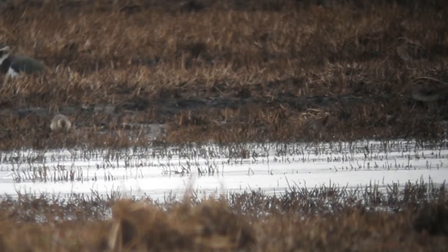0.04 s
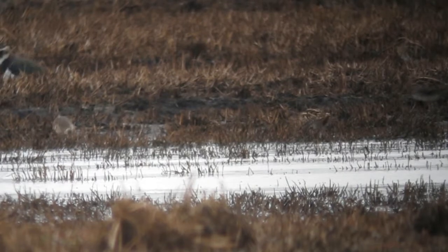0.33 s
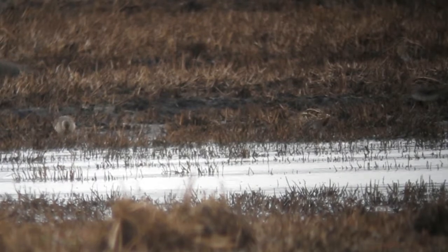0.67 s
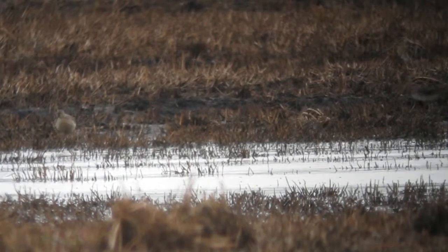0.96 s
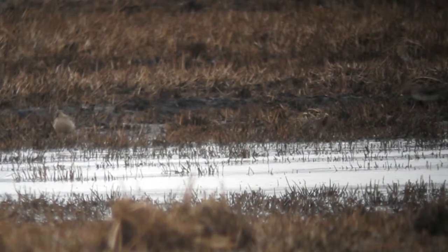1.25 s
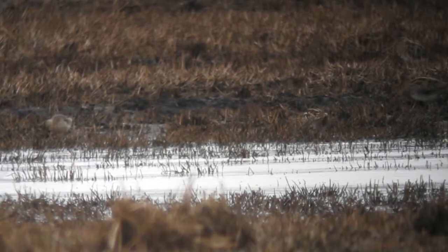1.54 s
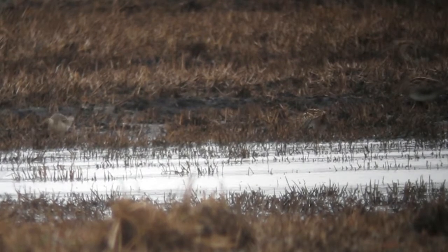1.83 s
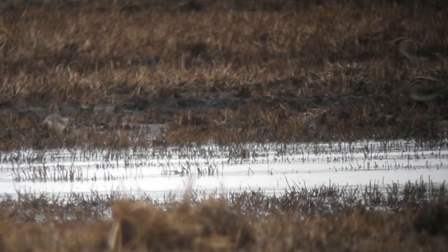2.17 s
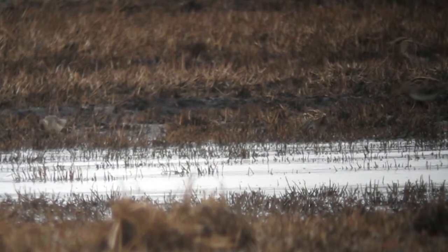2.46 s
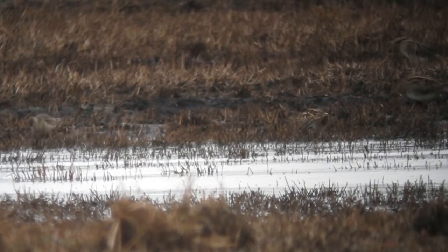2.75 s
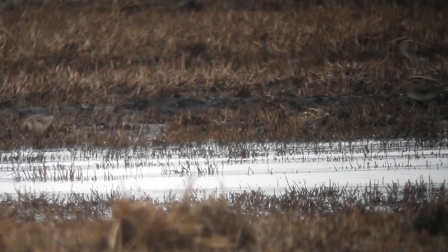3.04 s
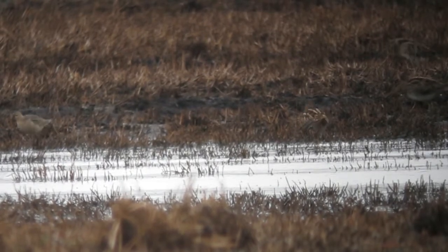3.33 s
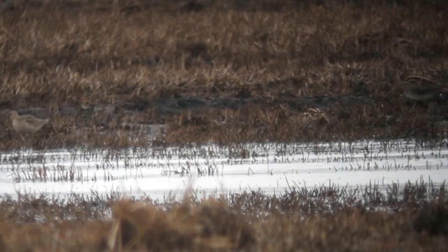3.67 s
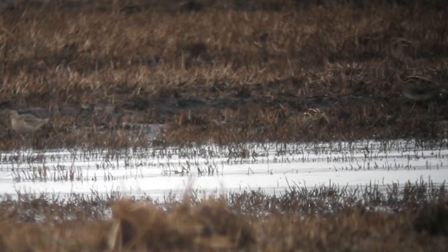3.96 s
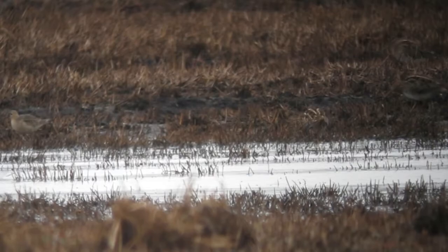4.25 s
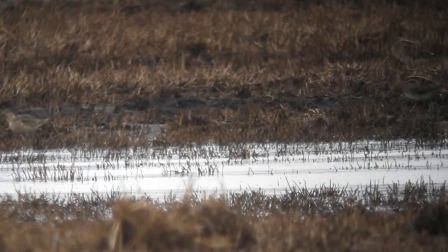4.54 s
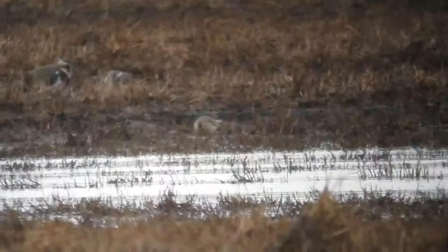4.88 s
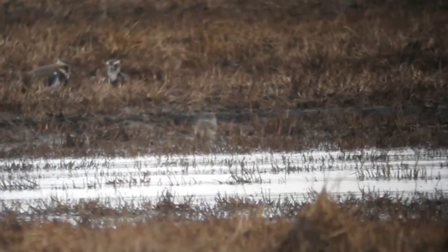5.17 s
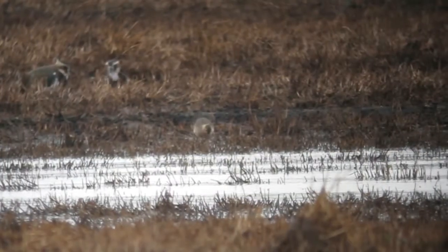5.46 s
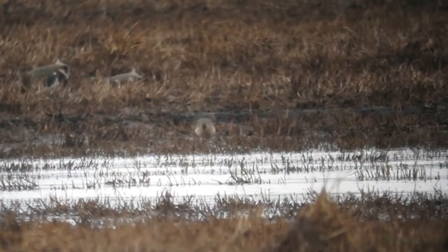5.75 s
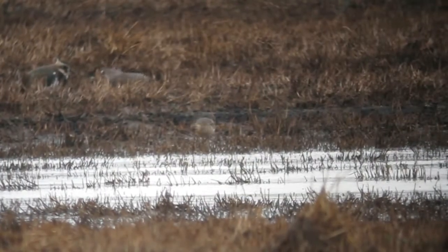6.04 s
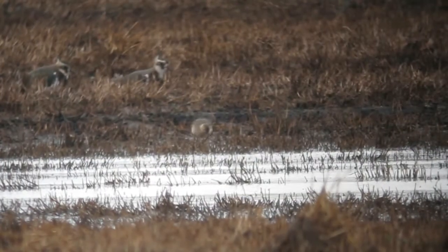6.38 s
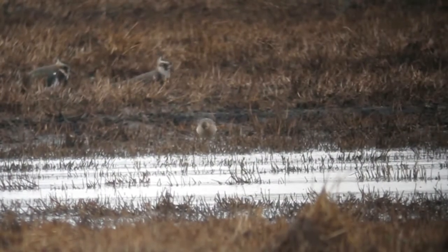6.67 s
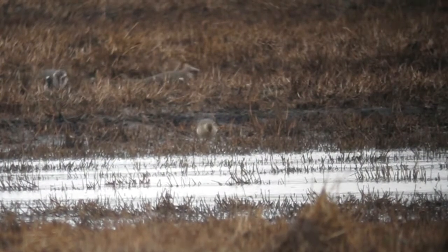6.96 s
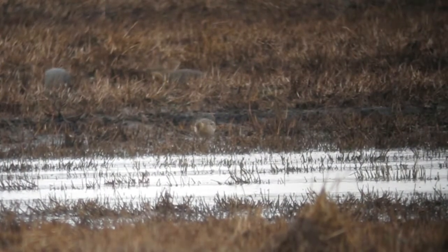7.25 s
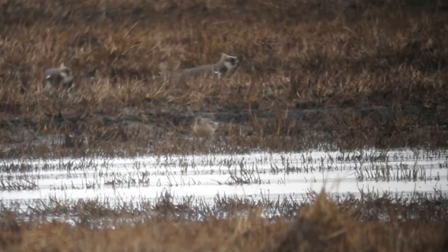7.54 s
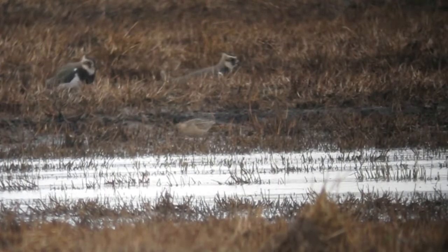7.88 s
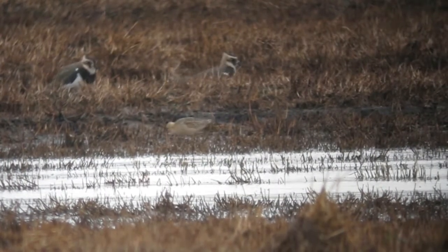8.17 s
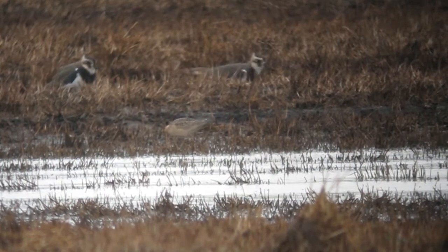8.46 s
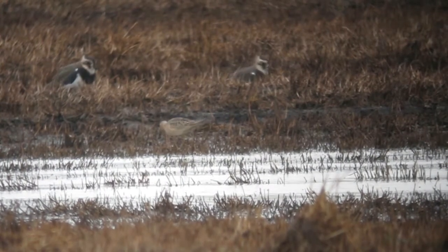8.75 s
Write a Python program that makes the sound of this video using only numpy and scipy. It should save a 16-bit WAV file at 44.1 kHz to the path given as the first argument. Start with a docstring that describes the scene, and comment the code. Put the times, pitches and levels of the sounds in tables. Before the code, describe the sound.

Low, thumping wind gusts hit the microphone while scattered raindrops tick close by and water birds twitter faintly far away.

```python
"""The edge of a flooded meadow in gusty wind and light rain, heard from a camera's two microphone ports.
Eddies buffet the ports, the left one most, and overload them; single drops tap on and around the body.
Grass hisses in the breeze, and one gust swishes through the nearest stalks. Far off a dull roar grows
over a low rumble, and water birds whistle and twitter in the distance."""
import sys
import numpy as np
from scipy import signal
from scipy.io import wavfile
from scipy.ndimage import uniform_filter1d

SR = 44100
rng = np.random.default_rng(int(sys.argv[2]) if len(sys.argv) > 2 else 0)


def transcribe(u):
    """Save the signal u as a 16-bit wav file named by the first command-line argument.

    u: samples, shape (n,) or (channels, n), limited to [-1, 1]; the rate is SR.
    q: integer samples, one column per channel.
    """
    v = np.clip(np.atleast_2d(u).T, -1, 1)
    q = np.round(v * 32767).astype(np.int16)
    wavfile.write(sys.argv[1], SR, q)


N = 392931

# Diffuse sound at the two ports. Each row: frequency in Hz, left-right correlation from -1 to 1.
PORT_LIKENESS = [(30, 0.5), (100, 1), (500, 0.83), (1000, 0.26), (2500, 0.057), (5000, -0.31),
                 (12000, 0.086)]
# Wind fluttering on the exposed left port between buffets. Each row: time in seconds, level in dB.
FLUTTER_LEVEL = [(0.0, -48), (0.45, -43), (1.3, -34.5), (1.95, -60.5), (2.25, -31.5), (2.75, -39.5),
                 (3.05, -82), (3.55, -36.5), (3.8, -61), (4.05, -34.5), (4.9, -38.5), (5.45, -50),
                 (6.05, -36.5), (7.45, -33.5), (7.8, -58), (8.91, -46)]
# Buffets on the ports. Each row: peak time in seconds, level at the windward port in dB,
# length in seconds, left over right in dB.
PORT_BUFFETS = [(0.592, -22, 0.05, 22), (0.694, -13.5, 0.072, 37), (0.791, -12, 0.027, 29),
                (0.85, -31.5, 0.1, -18), (0.926, -20.5, .04, 12), (0.981, -15.5, 0.062, 18),
                (1.085, -24.5, 0.083, 27), (1.216, -21.5, 0.16, 28), (2.149, -20.5, 0.031, 29),
                (2.292, -18, 0.068, 24), (2.345, -15.5, 0.081, 17), (2.395, -14, 0.07, 20),
                (2.474, -19.5, 0.091, 29), (2.62, -23.5, 0.093, 29), (3.496, -26.5, 0.043, 24),
                (3.635, -27, 0.073, 9), (4.23, -15, 0.052, 32), (4.292, -21, 0.077, 18),
                (4.362, -25, 0.032, 14), (4.424, -18.5, 0.054, 8), (4.565, -21.5, 0.094, 26),
                (4.73, -16.5, 0.053, 27), (4.867, -19.5, 0.03, -3.5), (4.894, -27, 0.13, 22),
                (5.088, -14.5, 0.026, 32), (5.148, -20, 0.075, 24), (5.22, -31.5, 0.056, -4),
                (5.288, -23.5, 0.1, 18), (5.538, -31, 0.098, 18), (5.622, -31.5, 0.11, 4),
                (5.71, -26, 0.11, 22), (6.186, -20, 0.12, 15), (6.414, -29.5, 0.034, 3),
                (6.501, -19.5, 0.082, 20), (6.729, -22, 0.045, -0.5), (6.915, -18, 0.07, 7.5),
                (6.956, -14, 0.034, 9), (7.007, -15, 0.064, -11), (7.029, -15.5, .1, 15),
                (7.184, -17.5, 0.033, 9), (7.244, -21.5, 0.15, 26), (7.391, -20, 0.064, 28),
                (7.464, -30.5, 0.13, 4.5), (7.578, -22, 0.068, 26), (7.993, -35.5, 0.11, 18),
                (8.158, -29.5, 0.045, -22), (8.757, -33, 0.027, 16)]
# Turbulence in a medium gust. Each row: frequency in Hz, relative density in dB.
BUFFET_SPECTRUM = [(20, -8), (45, 4.5), (85, 7), (190, -4.5), (300, -20), (480, -40), (750, -47),
                   (1100, -49)]
# Puffs running through the grass. Each row: peak time in seconds, hiss in dB, length in seconds.
GRASS_PUFFS = [(0.11, -55.5, 0.47), (0.64, -59.5, 0.59), (1.656, -60.5, 0.36), (2.81, -69, 1),
               (4.6, -66, 0.18), (5.327, -57.5, 0.64), (5.738, -60, 0.68), (6.147, -67.5, 0.17),
               (6.603, -65, 0.43), (8.203, -66, 0.63)]
# Hiss of the grass. Each row: frequency in Hz, relative density in dB.
GRASS_SPECTRUM = [(500, 6.5), (1200, 7), (2500, 4.5), (5000, 3.5), (7000, -8.5), (10500, -5.5),
                  (15500, -12)]
# The far roar growing. Each row: time in seconds, relative level in dB.
ROAR_GROWTH = [(0, -54), (1.8, -54.5), (3.2, -53), (5.0, -53.5), (5.7, -49.5), (7.7, -50), (8.3, -47.5),
               (8.91, -50)]
# Noise of the far roar. Each row: frequency in Hz, relative density in dB.
ROAR_SPECTRUM = [(120, -18.5), (260, 6), (420, -0.5), (600, -4.5), (750, -4), (950, -5), (1300, -28),
                 (2500, -40)]
# Resonances added to the roar. Each row: centre in Hz, width in Hz, gain in dB.
ROAR_RESONANCES = [(417, 24, -5), (592, 54, -1), (940, 650, -20.5)]
# Low rumble. Each row: frequency in Hz, relative density in dB.
RUMBLE_SPECTRUM = [(20, -10.5), (45, 3), (80, 0), (120, -5.5), (170, -18.5), (300, -21)]
# Modes of the camera body under a drop. Each row: frequency in Hz, gain in dB, seconds to fall 60 dB.
BODY_MODES = [(1220, 0, 0.0065), (1580, -15, 0.013), (2350, -11.5, 0.024), (3610, -11.5, 0.014),
              (5560, -30, 0.0076)]
# Raindrops close to the microphones. Each row: start in seconds, relative level in dB, ring in Hz,
# splash over knock in dB, left over right in dB.
CLOSE_DROPS = [(0.104, -40.5, 1560, -30, 8), (0.1263, -47.5, 2420, -15, -1), (0.1568, -42.5, 1590, -24, 6),
               (0.4645, -43.5, 2130, -10, 0.5), (0.526, -45.5, 3020, -16, 0.5), (0.756, -51, 2600, -11, 13),
               (0.8886, -48.5, 3100, -22, 3), (1.6094, -55.5, 2220, -24, 16),
               (2.1072, -47.5, 3180, -15, -2), (2.1207, -40.5, 1290, -25, -3),
               (2.6538, -41.5, 2200, -10, -1.5), (2.912, -50, 1430, -46, 3), (2.997, -50, 2400, -22, 1),
               (3.0768, -41.5, 1640, -39, 6), (3.63, -49, 2750, -16, 2), (3.6924, -52, 2320, -14, 0.5),
               (3.9756, -37, 2600, -20, 6), (4.2107, -50, 2630, -9, -1), (4.6847, -46.5, 1930, -11, 1.5),
               (4.724, -45, 2540, -13, 5), (5.1877, -37.5, 1680, -14.5, 8.5), (5.288, -47, 1330, -15, -3),
               (5.452, -47, 2600, -11, -1), (5.5355, -52, 2620, -14, 10), (5.9479, -48, 2210, -16, 13),
               (6.5173, -43, 2500, -20, 12), (6.5408, -48.5, 2370, -8, -1.5), (6.6239, -46.5, 3620, -21, 7),
               (6.6832, -56, 2190, -18, -1), (6.7629, -45, 1860, -17, -4.5),
               (8.1964, -46.5, 3140, -15, 3.5), (8.3471, -49, 1690, -22, 1), (8.5901, -42.5, 2020, -21, -2)]
# Fine ticks: droplets on the housing, and at 2.386 s one click of a gust overloading the left port.
# Each row: start in seconds, relative peak in dB, left over right in dB.
FINE_TICKS = [(1.4316, -48, 0), (1.9233, -42, 4), (2.386, -48, 20), (3.846, -40.5, 8), (4.2098, -43, -9),
              (4.6845, -34.5, 1.0), (4.8165, -39, -2.5), (7.573, -48, -0.5), (8.2315, -43, 4),
              (8.4741, -41, 6), (8.6931, -44, -7)]
# Hard eddies on the left port. Each row: centre in seconds, depth of the core in dB, pitch in Hz.
EDDY_SLAPS = [(0.688, 0, 129), (2.156, -23, 128), (2.329, -6.5, 165), (2.388, -2.5, 150),
              (4.221, -11.5, 170), (4.726, -10, 230), (4.737, -9.5, 121), (5.077, -14, 181),
              (6.917, -3, 217), (7.004, -6.5, 119), (7.178, -12, 254), (7.249, -9, 198),
              (7.387, -10.5, 167)]
# Distant bird whistles. Each row: start and length in seconds, first, middle and last pitch in Hz,
# relative level in dB.
BIRD_WHISTLES = [(2.05, .27, 3010, 3270, 3270, -65), (2.317, 0.13, 3250, 3270, 3720, -68),
                 (2.381, 0.026, 5760, 6000, 6000, -61), (2.484, 0.24, 3300, 3570, 3780, -66),
                 (2.658, .1, 3510, 3370, 3080, -64), (2.66, 0.16, 4680, 4270, 3900, -68),
                 (2.708, 0.3, 3700, 3690, 3240, -64), (3.0, 0.15, 3850, 4170, 3950, -67),
                 (7.466, 0.026, 3750, 3530, 3660, -56.5), (7.52, .25, 3900, 4150, 3700, -69),
                 (7.62, .09, 5560, 5470, 5300, -78), (7.797, 0.018, 4370, 4300, 4330, -60),
                 (7.93, 0.048, 3900, 4050, 4200, -66), (8.03, .053, 4420, 4630, 4800, -66),
                 (8.045, 0.14, 3840, 4070, 4230, -66.5), (8.243, .115, 4220, 4000, 3670, -65.5),
                 (8.26, 0.068, 5540, 5300, 5000, -77)]
# A gust in the nearest stalks. Each row: time in seconds, level in dB.
STALK_GUST = [(4.75, -100), (5.0, -73), (5.28, -64), (5.5, -64.5), (5.75, -65.5), (6.0, -74.5), (6.4, -100)]
# Swish of those stalks. Each row: frequency in Hz, relative density in dB.
STALK_SPECTRUM = [(3000, -5), (6000, 0), (9000, -2), (11500, 0), (15500, -9)]


def from_db(db):
    """Decibels to gain."""
    return np.exp(np.asarray(db) * np.log(10) / 20)


def rms_one(x):
    """Scale to an rms of 1."""
    return x / np.sqrt(np.mean(x ** 2) + 1e-20)


def in_time(rows):
    """Read a curve of (seconds, value) at every sample."""
    return np.interp(np.arange(N) / SR, *np.transpose(rows))


def every_sample(slow):
    """Stretch a slow control over the whole scene."""
    return np.interp(np.arange(N), np.linspace(0, N, len(slow)), slow)


def at_hz(points, hz):
    """Read a spectrum on a log-frequency axis."""
    frequencies, values = np.transpose(points)
    return np.interp(np.log(hz), np.log(frequencies), values)


def filtered(x, hz, kind, order=2):
    """Butterworth filter."""
    sections = signal.butter(order, np.clip(hz, 10, .45 * SR), kind, fs=SR, output="sos")
    return signal.sosfilt(sections, x)


def drift(rate):
    """Smooth chance with a spread of 1, changing about rate times a second."""
    hop, settle = 40, 2000
    pole = np.exp(-2 * np.pi * rate * hop / SR)
    white = rng.standard_normal(N // hop + settle + 2)
    slow = signal.lfilter([1], [1, -2 * pole, pole ** 2], white)[settle:]
    return np.interp(np.arange(N) / hop, np.arange(len(slow)), rms_one(slow))


def swell(s, length, roundness, rise_share=.44):
    """Slow gain of a rush of air: 1 at time s, length between its -10 dB points; roundness 2 is a bell."""
    t = np.arange(0, N, 20) / SR - s
    away = np.maximum(-t / rise_share, t / (1 - rise_share)) / length
    return from_db(-10 * np.minimum(away ** roundness, 20))


def add(out, s, sound, pan_db, lag=0):
    """Mix a sound in at time s, panned; the right port hears it lag samples later."""
    for channel, side in enumerate((1, -1)):
        i = max(int(s * SR) + lag * channel, 0)
        out[channel, i:i + len(sound)] += from_db(side * pan_db / 2) * sound[:max(N - i, 0)]


def noise_bands(spectrum):
    """Half-octave bands as (Hz, two unrelated noises); their powers follow the spectrum and sum to 1."""
    edges = 16 * 2 ** np.arange(0, 10.1, .5)
    centres = np.sqrt(edges[:-1] * edges[1:])
    used = np.flatnonzero((edges[1:] > spectrum[0][0]) & (edges[:-1] < spectrum[-1][0]))
    power = from_db(at_hz(spectrum, centres)) ** 2 * centres
    white = rng.standard_normal((2, 2, N))
    for k in used:
        band = rms_one(filtered(white[k % 2], edges[k:k + 2], "band"))
        yield centres[k], np.sqrt(power[k] / power[used].sum()) * band


def ambience(spectrum, flicker_db, tilt_db=0, pivot_hz=4500):
    """Sound from all around: bands flicker, tilt by tilt_db an octave, and are wider in the treble."""
    out = 0
    for hz, (mid, side) in noise_bands(spectrum):
        alike = at_hz(PORT_LIKENESS, hz)
        gain = from_db(flicker_db * drift(4.4) + tilt_db * np.log2(hz / pivot_hz))
        out += gain * (np.sqrt(1 + alike) * mid + np.sqrt(1 - alike) * side * [[1], [-1]])
    return out


def airflow(right_lee_db=-9.5, flutter_db=3.0):
    """Wind level in dB at each port: buffets on top of a flutter, from which the right is sheltered."""
    buffet_power = 0
    for s, level_db, length, pan_db in PORT_BUFFETS:
        ports = from_db(level_db + np.minimum([[pan_db], [-pan_db]], 0))
        buffet_power += (ports * swell(s, length, roundness=2.3)) ** 2
    wind_db = in_time(FLUTTER_LEVEL)
    flutter = [from_db(wind_db + lee_db + flutter_db * drift(10)) for lee_db in (0, right_lee_db)]
    return 10 * np.log10([every_sample(p) + f ** 2 for p, f in zip(buffet_power, flutter)])


def buffeting(medium_db=-25, brighten=0.43, pivot_hz=110, lumpy_db=3.0, even_s=0.037, port_hz=590):
    """Turbulence right on each port; faster air brings smaller eddies, so strong gusts are brighter."""
    flow_db = airflow()
    tilt_db = brighten * (flow_db - medium_db)
    eddies_db = lumpy_db * np.array([drift(50), drift(35)])
    pressure = 0
    for hz, noise in noise_bands(BUFFET_SPECTRUM):
        octaves = np.log2(hz / pivot_hz)
        pressure += noise * from_db(tilt_db * min(octaves, 2) + eddies_db * np.clip(octaves, 0, 2))
    # the flow alone sets the strength of the pressure swings
    window = int(even_s * SR)
    power = uniform_filter1d(uniform_filter1d(pressure ** 2, window), window)
    swings = from_db(flow_db) * pressure / np.sqrt(power + 1e-12)
    # eddies smaller than a port average out across it
    return filtered(swings, port_hz, "low", order=4)


def grass(steady_db=-63, trim_db=-0.5, brighten=0.066):
    """Stalks across the meadow hiss in a steady breeze, louder and brighter with each puff."""
    puff_power = sum((from_db(db) * swell(s, length, roundness=1.86)) ** 2
                     for s, db, length in GRASS_PUFFS)
    breeze_db = 10 * np.log10(every_sample(puff_power) + from_db(steady_db) ** 2)
    tilt_db = brighten * (breeze_db - np.median(breeze_db))
    return from_db(breeze_db + trim_db) * ambience(GRASS_SPECTRUM, flicker_db=1.62, tilt_db=tilt_db)


def far_roar(trim_db=-4.0):
    """A dull, slightly hollow roar from far beyond the meadow."""
    noise = ambience(ROAR_SPECTRUM, flicker_db=2.55)
    hollow = sum(from_db(db) * signal.lfilter(*signal.iirpeak(hz, hz / width, fs=SR), noise)
                 for hz, width, db in ROAR_RESONANCES)
    return from_db(in_time(ROAR_GROWTH) + trim_db) * (noise + hollow)


def rumble(level_db=-48.0):
    """An unbroken low rumble all around the microphones."""
    return from_db(level_db) * ambience(RUMBLE_SPECTRUM, flicker_db=3.0)


def drop_tap(ring_hz, splash_db, knock_cycles=9, splash_t60=0.0064, tail_db=-30, tail_t60=0.2):
    """One drop lands: a damped knock, the modes of the body, a short scattered tail and a tiny splash."""
    t = np.arange(int(.05 * SR)) / SR
    knock = np.sin(2 * np.pi * ring_hz * t) * from_db(-60 * t * ring_hz / knock_cycles)
    # where the drop lands decides how strongly each mode answers
    for hz, level_db, t60 in BODY_MODES:
        strength, detune = rng.standard_normal(2)
        mode = np.sin(2 * np.pi * hz * (1 + 0.13 * detune) * t)
        knock += mode * from_db(level_db + 1.5 * strength - 60 * t / t60)
    tail = filtered(rng.standard_normal(len(t)), [1200, 5000], "band")
    knock += tail * from_db(tail_db - 60 * t / tail_t60)
    spray = rng.standard_normal(len(t)) * from_db(-60 * t / splash_t60)
    splash = filtered(spray, [4400, 11000], "band", order=1)
    # a big soft drop gives a low knock, a small one a high knock
    thud = filtered(knock, [ring_hz * 0.5, ring_hz * 2.14], "band")
    return (rms_one(thud) + from_db(splash_db) * rms_one(splash)) / np.sqrt(10)


def rain_and_ticks(tap_trim_db=1.66, tick_trim_db=-4.0, tick_t60=0.0042, faint_count=20):
    """Drops tap close by and faintly farther off; droplets and one overloading gust make fine ticks."""
    out = np.zeros((2, N))
    for s, level_db, ring_hz, splash_db, pan_db in CLOSE_DROPS:
        tap = from_db(level_db + tap_trim_db) * drop_tap(ring_hz, splash_db)
        add(out, s, tap, pan_db, lag=int(np.clip(pan_db * 2, -8, 8)))
    t = np.arange(int(.01 * SR)) / SR
    for s, peak_db, pan_db in FINE_TICKS:
        burst = rng.standard_normal(len(t)) * from_db(-60 * t / tick_t60)
        tick = filtered(burst, [5000, 13000], "band")
        add(out, s, from_db(peak_db + tick_trim_db) * tick / abs(tick).max(), pan_db)
    for when, size, pitch, side in rng.random((faint_count, 4)):
        tap = from_db(-61 + 8 * size) * drop_tap(ring_hz=1800 + 1700 * pitch, splash_db=-14)
        add(out, when * N / SR, tap, pan_db=11 * (side - .5))
    return out


def slaps(burst_db=-17, burst_s=.004):
    """An eddy core crosses the left port: a pressure dip between two rises, shedding small eddies."""
    out = np.zeros((2, N))
    t = np.arange(-SR // 40, SR // 40) / SR
    for s, depth_db, hz in EDDY_SLAPS:
        spread = (np.pi * hz * t) ** 2
        core = (2 * spread - 1) * np.exp(-spread)
        shreds = rms_one(filtered(rng.standard_normal(len(t)), [230, 540], "band", order=3))
        burst = from_db(burst_db) * np.exp(-(t / burst_s) ** 2) * shreds
        i = int((s + t[0]) * SR)
        out[0, i:i + len(t)] += from_db(depth_db) * (core + burst)
    return out


def whistle(length, start_hz, middle_hz, end_hz, waver=0.008):
    """A bird's nearly pure note glides along an arch, unsteady after its way through moving air."""
    progress = np.linspace(0, 1, int(length * SR))
    arch = np.polyfit([0, .5, 1], [start_hz, middle_hz, end_hz], 2)
    wobble, fading_db = (np.interp(progress, np.linspace(0, 1, 10), row)
                         for row in rng.standard_normal((2, 10)))
    hz = np.polyval(arch, progress) * (1 + waver * wobble)
    envelope = np.sqrt(2 * abs(np.sin(np.pi * progress))) * from_db(fading_db)
    return envelope * np.sin(2 * np.pi * np.cumsum(hz) / SR)


def birds(call_trim_db=-2.5, chirp_count=320, flock_db=-73.5, nearest_boost_db=6.5, scatter_t60=.3):
    """Distant whistles over the twitter of a far flock, with a scattered tail from the open ground."""
    calls, flock = np.zeros((2, 2, N))
    for s, length, *pitches_hz, level_db in BIRD_WHISTLES:
        add(calls, s, from_db(level_db + call_trim_db) * whistle(length, *pitches_hz), pan_db=1)
    for when, span, pitch, slide, near, side in rng.random((chirp_count, 6)):
        s = when ** .7 * N / SR  # the flock grows busier
        hz = 3700 + 2800 * pitch ** 1.2
        glide = .14 * (slide - .5)
        chirp = whistle(.012 + .03 * span, hz * (1 - glide), hz, hz * (1 + glide), waver=.025)
        level_db = flock_db + nearest_boost_db * near ** 2 - 4 * pitch  # distance dulls high notes
        add(flock, s, from_db(level_db) * chirp, pan_db=8 * (side - .5))
    t = np.arange(SR // 2) / SR
    tail = rng.standard_normal((2, len(t))) * from_db(-60 * t / scatter_t60)
    scatter = rms_one(tail) / np.sqrt(len(t))
    # the flock is so far off that half of its sound arrives scattered
    return calls + flock + signal.oaconvolve(calls / 2 + flock, scatter, axes=1)[:, :N]


def swish(brighten=0.22, strong_db=-66):
    """The stalks nearest the microphones rub in a gust, brightest at its height."""
    level_db = in_time(STALK_GUST)
    tilt_db = brighten * np.maximum(level_db - strong_db, -10)
    return from_db(level_db) * ambience(STALK_SPECTRUM, flicker_db=-0.5, tilt_db=tilt_db)


def scene(meadow_pan_db=0.66):
    """Wind and rain right at the microphones, the meadow and its birds behind."""
    balance = from_db([[meadow_pan_db / 2], [-meadow_pan_db / 2]])
    meadow = balance * (rumble() + far_roar() + grass() + swish())
    return meadow + buffeting() + slaps() + rain_and_ticks() + birds()


def limiter(x, threshold=.43, recovery_db_per_s=35):
    """Peaks pull the gain of both channels down, looking a millisecond ahead."""
    over_db = np.maximum(20 * np.log10(abs(x).max(axis=0) / threshold + 1e-9), 0)
    ahead_db = np.roll(over_db, -SR // 1000)
    recovery_db = recovery_db_per_s * np.arange(N) / SR
    held_db = np.maximum.accumulate(ahead_db + recovery_db) - recovery_db
    return x * from_db(-filtered(held_db, 130, "low", order=1))


def record(dry, ceiling=.49, notch_hz=8200, notch_width_hz=625, whine_hz=8811, whine_db=-81):
    """The camera limits and clips gusts, notches the treble, adds an electronic whine and cuts the top."""
    clipped = np.clip(limiter(dry), -ceiling, ceiling)
    notch = signal.iirnotch(notch_hz, notch_hz / notch_width_hz, fs=SR)
    notched_twice = signal.lfilter(*notch, signal.lfilter(*notch, clipped))
    wavering_hz = whine_hz + 12 * drift(15.8)
    whine = from_db(whine_db) * np.sin(2 * np.pi * np.cumsum(wavering_hz) / SR)
    top_cut = signal.ellip(12, .1, 80, 15750, fs=SR, output="sos")  # steep above 15750 Hz
    return signal.sosfilt(top_cut, notched_twice + whine)


dry = scene()
out = record(dry)
transcribe(out)
```